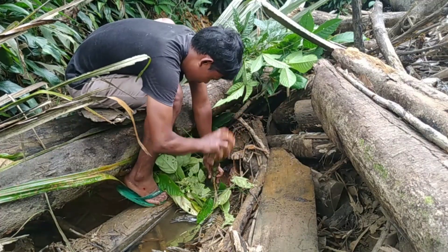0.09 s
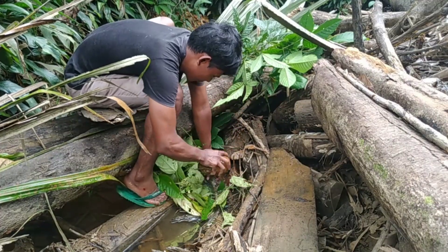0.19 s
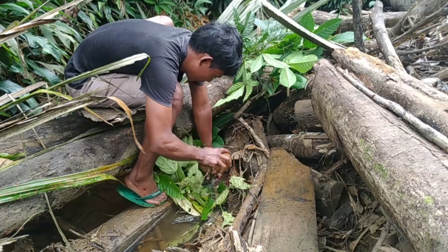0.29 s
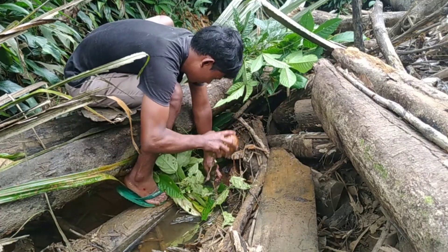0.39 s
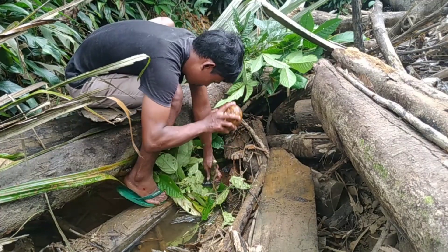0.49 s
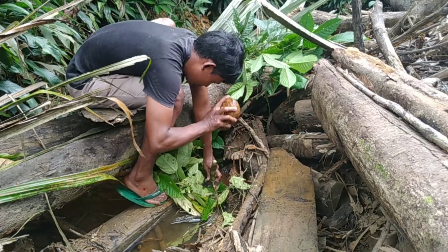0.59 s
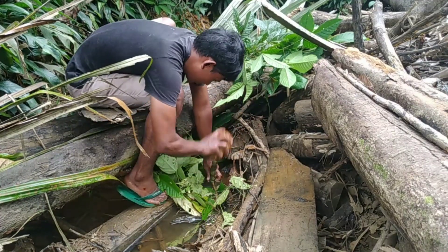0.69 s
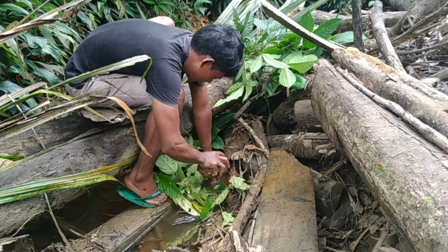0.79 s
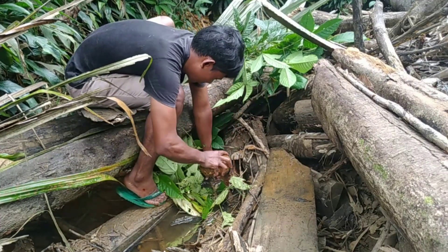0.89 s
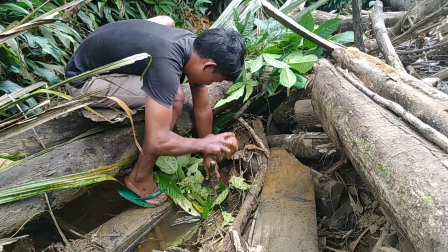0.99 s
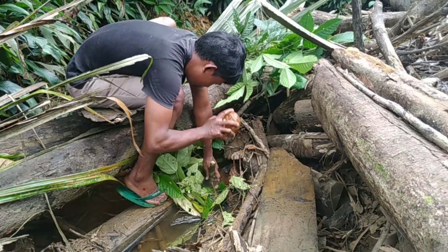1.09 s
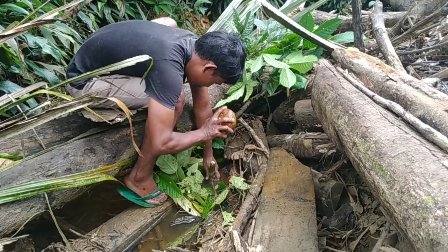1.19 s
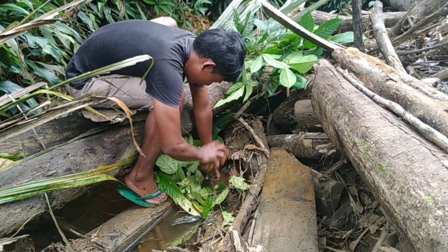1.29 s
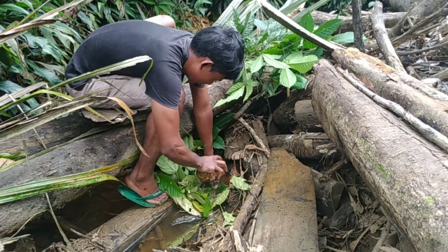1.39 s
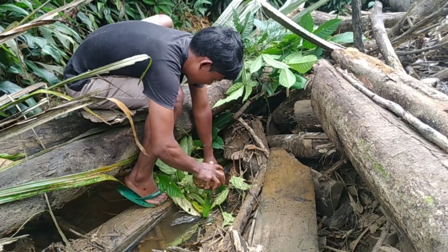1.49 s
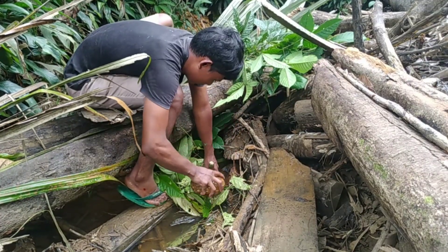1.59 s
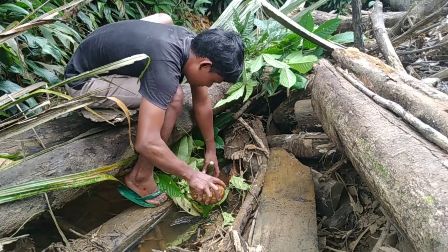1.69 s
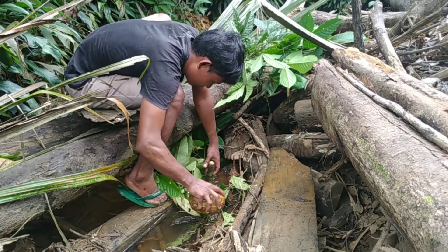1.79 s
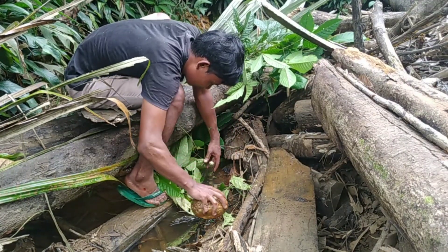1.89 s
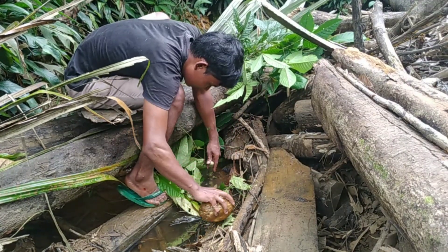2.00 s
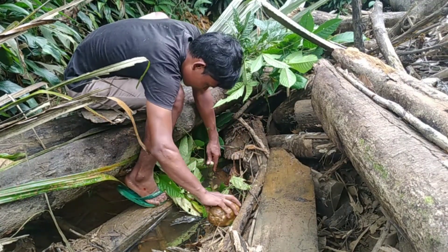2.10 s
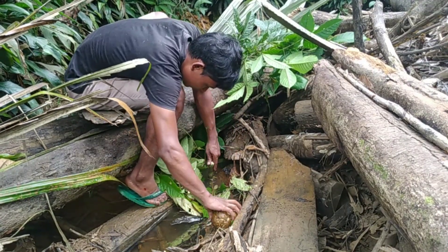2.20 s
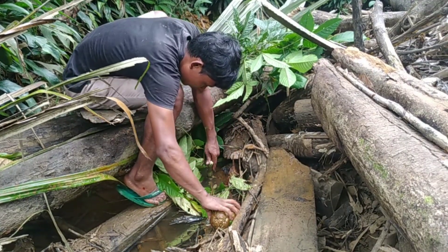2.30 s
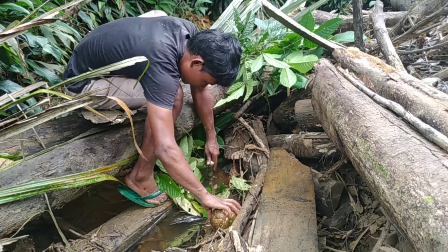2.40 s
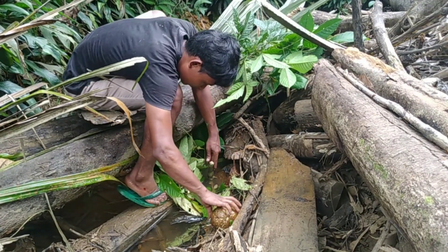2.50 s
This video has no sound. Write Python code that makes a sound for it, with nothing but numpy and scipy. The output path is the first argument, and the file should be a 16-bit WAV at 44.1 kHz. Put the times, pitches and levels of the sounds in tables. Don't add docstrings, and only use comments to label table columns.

```python
import sys
import numpy as np
from scipy import signal
from scipy.io import wavfile

SR = 44100
rng = np.random.default_rng(int(sys.argv[2]) if len(sys.argv) > 2 else 0)


def gain_from_decibels(decibels):
    exponent = np.asarray(decibels, float) / 20
    return 10 ** exponent


def int16_out(signal):
    q = np.round(np.clip(np.atleast_2d(signal).T, -1, 1) * 32767)
    wavfile.write(sys.argv[1], SR, q.astype(np.int16))


N = 112455
CONTACT_S, LEFT_LAG = 0.00076, 4


def rms_one(x):
    return x / np.sqrt(np.mean(x ** 2) + 1e-20)


def butter(x, order, hz, kind="low"):
    return signal.sosfilt(signal.butter(order, hz, kind, fs=SR, output="sos"), x)


def over_time(points):
    return np.interp(np.arange(N) / SR, *np.transpose(points))


def drift(rate):
    r = np.exp(-80 * np.pi * rate / SR)
    slow = signal.lfilter([1], [1, -2 * r, r * r], rng.standard_normal(N // 40 + 2002))[2000:]
    return np.interp(np.arange(N) / 40, np.arange(len(slow)), rms_one(slow))


def resonance(x, hz, width_hz):
    r = np.exp(-np.pi * width_hz / SR)
    zeros = np.array([1, 0, -1]) * (1 - r * r) / 2
    return signal.lfilter(zeros, [1, -2 * r * np.cos(2 * np.pi * hz / SR), r * r], x)


def grains(per_s, spread_db):
    sizes = gain_from_decibels(spread_db * np.minimum(rng.exponential(1, (2, N)), 4))
    sizes = sizes * rng.choice([-1, 1], (2, N))
    return rms_one(sizes * (rng.random((2, N)) < per_s / SR)) + 1e-18


def both_ears(x):
    return np.array([np.roll(x, LEFT_LAG), x])[:, :N]


# t/s, strength level/dB, log thump level/dB, bark crack f/Hz, crack level/dB
CONTACTS = [(0.2202, -6.5, -19, 2490, -7), (0.2243, -27, -30, 400, -7), (0.2286, -18, -57, 2820, -32),
            (0.3288, -49, -70, 1610, -21), (.3284, -58, -66, 750, -39), (0.3276, -57, -47, 2910, -23.5),
            (0.8337, -5, -18, 993, -18), (0.8361, -18, -43, 483, -15), (0.8407, -44, -36, 1500, -29),
            (1.4220, -7.5, -19, 3110, -18), (1.4301, -11, -27, 1300, -24), (2.2610, -32, -44, 1090, -42),
            (2.2655, -37, -49, 870, -30), (2.2690, -29.5, -43, 1000, -52)]
# f/Hz, level/dB, t60/s
LOG_MODES = [(200, -7, 0.043), (337, -8, 0.043), (395, -4, 0.033), (482.5, -4, 0.027), (580, -9, 0.041),
             (750, -11, 0.031), (932, -5.5, 0.016), (1332, -3.5, 0.01), (2000, -39, 0.027)]


def knocks():
    mode_spread_db, pitch_spread = 1.5, 0.0233
    crack_t60_s, thump_t60_s, thump_rise_s = 0.018, 0.12, 0.003
    out, t = np.zeros(N + SR), np.arange(SR // 2) / SR
    chance = rng.standard_normal((len(CONTACTS), 2, len(LOG_MODES)))
    for (s, db, thump_db, crack_hz, crack_db), (loud, tune) in zip(CONTACTS, chance):
        ring = gain_from_decibels(crack_db - 60 * t / crack_t60_s) * np.sin(2 * np.pi * crack_hz * t)
        for (hz, level_db, t60), a, b in zip(LOG_MODES, loud, tune):
            decay = gain_from_decibels(db + level_db + mode_spread_db * a - 60 * t / t60)
            ring = ring + decay * np.sin(2 * np.pi * hz * (1 + pitch_spread * b) * t)
        ring = butter(ring * (1 - np.exp(-t / CONTACT_S)), 2, 120, "high")
        pair = np.sin(2 * np.pi * 100.6 * t) + gain_from_decibels(-8.5) * np.sin(2 * np.pi * 132.6 * t)
        thump = gain_from_decibels(thump_db - 60 * t / thump_t60_s) * (1 - np.exp(-t / thump_rise_s)) * pair
        out[int(s * SR):int(s * SR) + len(t)] += ring - thump
    return both_ears(out)


# t/s, f/Hz, t60/s, level/dB
CONTACT_NOTES = [(.2203, 1080, 0.011, -13), (.2210, 3070, .012, -7.5), (.2225, 2320, 0.017, -13),
                 (.2255, 561, .046, -15.5), (.2310, 714, 0.032, -26), (.2370, 570, 0.02, -46),
                 (.3070, 1620, .02, -40), (.3080, 3000, .02, -34), (.3295, 524, 0.018, -33.5),
                 (.3300, 1020, .02, -46), (.3325, 2330, 0.017, -24), (.3385, 960, 0.015, -34),
                 (.8340, 1190, .012, -7.5), (.8340, 2360, .01, -13), (.8342, 3200, .01, -19),
                 (.8358, 437, 0.016, -9.5), (.8420, 506, 0.019, -41), (.8445, 2230, 0.011, -17),
                 (.8470, 3200, 0.018, -18.5), (.8670, 680, 0.039, -33), (.9320, 1600, .02, -41),
                 (1.4227, 364, .03, -17.5), (.8375, 480, 0.011, -14), (0.2214, 420, 0.018, -16.5),
                 (2.2650, 1700, .02, -42), (1.4228, 3230, 0.017, -12), (1.4230, 1976, 0.017, -14.5),
                 (1.4260, 2180, 0.025, -21), (1.4310, 599, 0.029, -12.5), (1.4330, 910, .02, -33),
                 (1.4420, 2900, 0.013, -14.5), (1.4470, 2200, 0.035, -26), (2.2590, 1500, .02, -36),
                 (2.2625, 810, 0.023, -41), (2.2700, 403, 0.045, -31.5), (2.2735, 3700, 0.016, -34),
                 (2.2760, 4500, .012, -44), (2.2870, 2500, .015, -45), (2.2885, 4800, .012, -46)]


def contact_notes():
    out, t = np.zeros(N + SR), np.arange(SR // 8) / SR
    for s, hz, t60, db in CONTACT_NOTES:
        envelope = gain_from_decibels(db - 60 * t / t60) * (1 - np.exp(-t / CONTACT_S))
        out[int(s * SR):int(s * SR) + len(t)] += envelope * np.sin(2 * np.pi * hz * t)
    return both_ears(out)


# t/s, rise/s, t60/s, level/dB, brightest f/Hz
CRUNCHES = [(.2200, 0.0005, 0.012, -23.5, 15100), (.2203, 0.00091, 0.14, -26, 14100),
            (.2208, 0.00044, 0.13, -22.5, 3200), (.24, 0.038, 0.36, -48.5, 2000),
            (.308, 0.0015, 0.014, -41, 3500), (.327, 0.00073, 0.1, -35, 2450),
            (.8339, 0.00015, 0.0075, -21, 16100), (.8342, 0.0011, 0.16, -28, 13700),
            (.844, 0.00035, .015, -22.5, 14100), (.8522, .0004, 0.017, -31, 15000),
            (.8345, 0.0034, 0.063, -23, 2000), (.855, 0.013, 0.24, -42, 2900),
            (.895, 0.0078, 0.17, -40.5, 16000), (.935, 0.0026, 0.048, -51.5, 1800),
            (1.4220, 0.0031, 0.08, -25.5, 15700), (1.4225, 0.00046, 0.15, -26, 3070),
            (1.438, 0.0048, 0.074, -30, 13200), (1.465, 0.018, 0.18, -43.5, 1440),
            (1.72, 0.0085, 0.35, -50, 1120), (2.26, 0.0018, 0.21, -45, 2050),
            (2.272, 0.0022, 0.15, -42.5, 13300), (.232, 0.011, 0.18, -41.5, 496),
            (.848, 0.0088, 0.16, -35, 447), (1.44, 0.01, 0.31, -39, 448), (.329, .002, 0.056, -41, 1500),
            (2.258, 0.0014, 0.069, -47, 2980)]


def crunches():
    grains_per_s, spread_db, alike = 12000, 2, 0.51
    out, t = np.zeros((2, N + SR)), np.arange(SR // 2) / SR
    own, shared = grains(grains_per_s, spread_db), grains(grains_per_s, spread_db)
    litter = np.sqrt(1 - alike) * own + np.sqrt(alike) * shared[0]
    litter = np.pad(litter, ((0, 0), (0, SR)))
    for k, (s, rise, t60, db, top_hz) in enumerate(CRUNCHES):
        i = int(s * SR)
        start = i + 99 * k
        burst = butter(litter[:, start:start + len(t)], 2, [top_hz / 7, top_hz], "band")
        envelope = gain_from_decibels(db - 60 * np.maximum(t - rise, 0) / t60) * np.minimum(t / rise, 1)
        out[:, i:i + len(t)] += envelope * rms_one(burst)
    return out[:, :N]


# t/s, f/Hz, level/dB
NEAREST_WHINER = [(0.68, 12130, -60), (0.726, 12142, -43), (0.766, 12153, -57), (0.798, 12162, -48),
                  (1.124, 12250, -44), (1.138, 12254, -33.5), (1.244, 12281, -52), (1.518, 12349, -51),
                  (1.566, 12362, -39), (1.7, 12395, -47), (1.756, 12409, -42), (1.862, 12436, -57),
                  (1.924, 12451, -39), (1.992, 12468, -54), (2.068, 12480, -42), (2.256, 12508, -55),
                  (2.336, 12520, -45), (2.4, 12530, -61)]


def nearest_whiner():
    t, (s, hz, db) = np.arange(N) / SR, np.transpose(NEAREST_WHINER)
    wander_hz = np.array([4 * drift(29), 4 * drift(22)])
    phase = 2 * np.pi * np.cumsum(np.interp(t, s, hz) + wander_hz, axis=1) / SR
    return gain_from_decibels(np.interp(t, s, db, left=-120, right=-120)) * np.sin(phase)


# start t/s, end t/s, start f/Hz, end f/Hz
WHINES = [(-.3, .16, 12250, 12240), (.15, 1.5, 12220, 12720), (.9, 2.3, 12130, 12290),
          (.7, 1.8, 11730, 11860), (1.08, 1.9, 12880, 12740), (1.4, 2.3, 12700, 12860),
          (2.1, 2.7, 12700, 12620), (2.26, 2.9, 12080, 12170), (2.3, 2.8, 11810, 11850),
          (-.2, .35, 3050, 3070), (.3, 1.5, 3030, 3070), (1.45, 2.2, 3085, 3130), (1.15, 2.0, 3200, 3185),
          (1.05, 1.4, 2940, 2960), (2.25, 2.8, 3170, 3150), (2.28, 2.8, 3030, 3030)]
WHINE_LEVELS = [-53, -57, -48.5, -59, -57, -57, -59, -51, -55, -57, -63, -54, -52.5, -63, -53, -55.5]


def whines():
    wander_hz, flutter_db = 8, 3.5
    out, t = 0, np.arange(N) / SR
    for (start, end, from_hz, to_hz), db in zip(WHINES, WHINE_LEVELS):
        done = np.clip((t - start) / (end - start), 0, 1)
        hz = from_hz + (to_hz - from_hz) * done + wander_hz * np.array([drift(39), drift(31)])
        phase = 2 * np.pi * np.cumsum(hz, axis=1) / SR + [[0], [rng.uniform(0, 2 * np.pi)]]
        swell = np.abs(np.sin(np.pi * done)) ** 0.1 * (done < 1)
        flutter = gain_from_decibels(db + flutter_db * np.array([drift(7.8), drift(13.4)]))
        out = out + swell * flutter * np.sin(phase)
    return out


def insects(voices, ticks_per_s, sway_db, sway_rate):
    out = 0
    for hz, width_hz, db in voices:
        rung = resonance(grains(ticks_per_s, -1.0), hz, width_hz)
        rung = resonance(rung, hz, width_hz)
        out = out + gain_from_decibels(db + sway_db * drift(sway_rate)) * rms_one(rung)
    return out


# f/Hz, width/Hz, level/dB
CHORUS = [(6580, 1110, -50), (7220, 750, -51), (7700, 2040, -51), (9015, 640, -51.5), (9590, 860, -52),
          (9600, 1800, -55), (12540, 1200, -57), (14430, 570, -58)]
# f/Hz, width/Hz, level/dB
SINGERS = [(7200, 90, -63), (9350, 60, -64), (9740, 60, -64), (9900, 30, -68), (10130, 50, -65)]
# t/s, level/dB
CHORUS_SWELL = [
    (0, 0.5),
    (.6, 0.5),
    (1, .5),
    (1.6, 0),
    (2.55, 0),
]


def cicadas():
    drone = insects(CHORUS, 7300, -2, 3.9) + insects(SINGERS, 7300, 1.0, 1.8)
    return gain_from_decibels(over_time(CHORUS_SWELL)) * drone


# f/Hz, width/Hz, level/dB
CRICKETS = [(3050, 45, -62), (3106, 86, -63.5), (3200, 53, -65.5), (3190, 47, -67.5)]
# t/s, level/dB
CRICKET_SWELL = [
    (0, -2.5),
    (.4, -3),
    (.8, 4),
    (1.15, -1.5),
    (1.55, -6.5),
    (2.05, 0),
    (2.55, -1),
]


def crickets():
    return gain_from_decibels(over_time(CRICKET_SWELL)) * insects(CRICKETS, 900, -1.5, 10.0)


# f/Hz, level/dB per Hz
AIR_SPECTRUM = [(15, 3), (58, -4), (147, -22), (477, -25), (695, -29), (2400, -32.5), (3460, -30.5),
                (4600, -39), (6000, -26.5), (7800, -72),]
# f/Hz, correlation
LIKENESS = [(60, 0.77), (240, 0.51), (950, 0.024), (3770, 0.01), (15000, 0.01)]
# t/s, level/dB
GUSTS = [(0, -2.5), (.3, -4.5), (.55, -3), (.75, 1.5), (.98, 3), (1.2, -4.5), (1.36, -3), (1.52, 4.5),
         (1.8, -3.5), (2.1, -0.5), (2.3, 0), (2.55, -1)]


def at_hz(points, hz):
    table = np.array(points)
    return np.interp(np.log(hz), np.log(table[:, 0]), table[:, 1])


def air():
    air_db, patchy_db, gust_top_hz = -44, 2, 194
    out, edges = 0, 14 * 2 ** np.arange(0, 9.1, .5)
    gust_db = over_time(GUSTS)
    white = rng.standard_normal((2, 2, N + SR))
    for k, (low, high) in enumerate(zip(edges, edges[1:])):
        mid, side = butter(white[k % 2], 2, [low, high], "band")[:, SR:]
        hz = np.sqrt(low * high)
        alike = np.clip(at_hz(LIKENESS, hz), -1, 1)
        stereo = np.sqrt(1 + alike) * mid + np.sqrt(1 - alike) * side * [[1], [-1]]
        gust = gust_db / (1 + (hz / gust_top_hz) ** 2)
        flicker = patchy_db * drift(5.1) / (1 + hz / 2000)
        out = out + gain_from_decibels(at_hz(AIR_SPECTRUM, hz) + gust + flicker) * stereo
    return gain_from_decibels(air_db) * rms_one(out)


def scene():
    impacts = knocks() + contact_notes() + crunches()
    drone = nearest_whiner() + whines() + cicadas() + crickets()
    return impacts + drone + air()


def low_pass(x):
    return signal.sosfilt(signal.butter(12, 16480, fs=SR, output="sos"), x)


def record(dry):
    left, right = dry
    left = butter(left, 2, 8740)
    treble = butter(right, 2, 12600, "high")
    port = gain_from_decibels(23.93) * resonance(treble, 10710, 1080)
    right = right - gain_from_decibels(5) * treble - port
    both = np.clip([left, right], -.97, .97)
    both = signal.sosfilt(signal.cheby2(12, 50, 16400, fs=SR, output="sos"), both)
    return low_pass(both)


dry = scene()
out = record(dry)
int16_out(out)
```